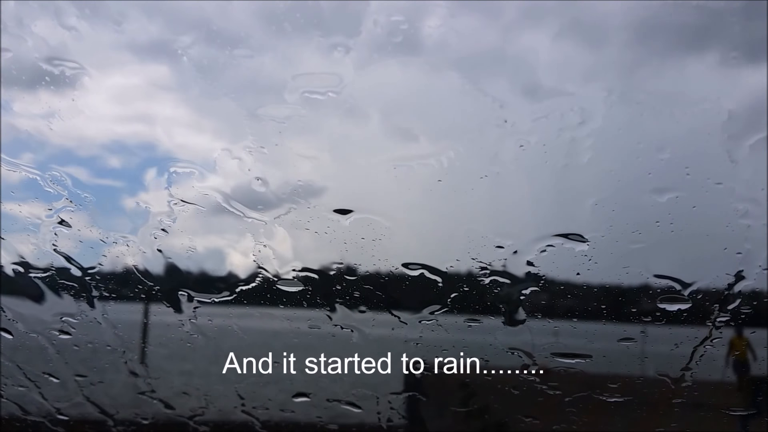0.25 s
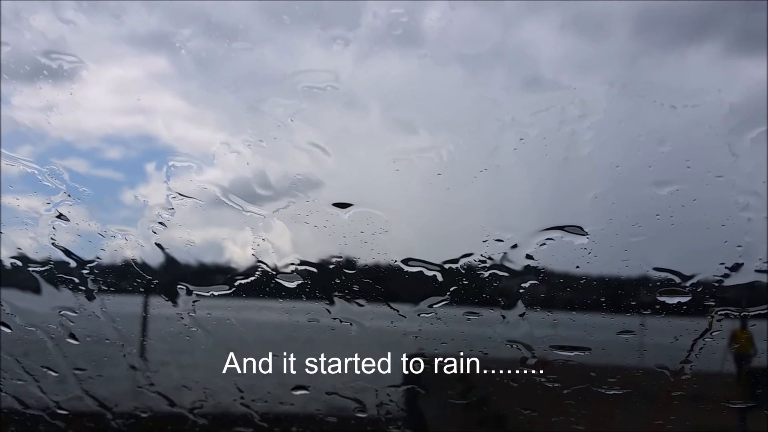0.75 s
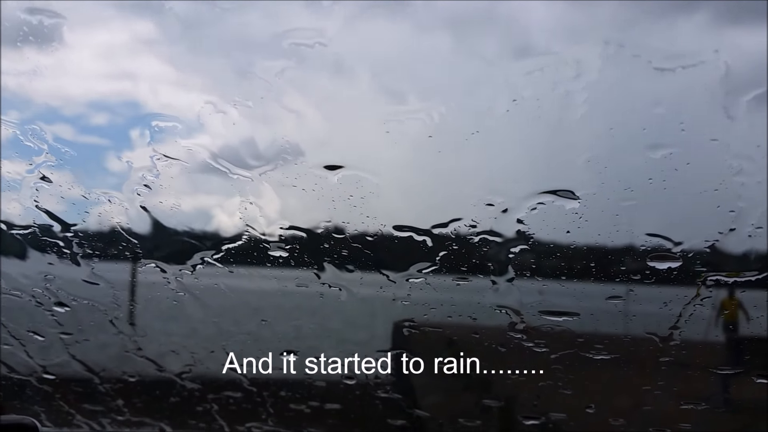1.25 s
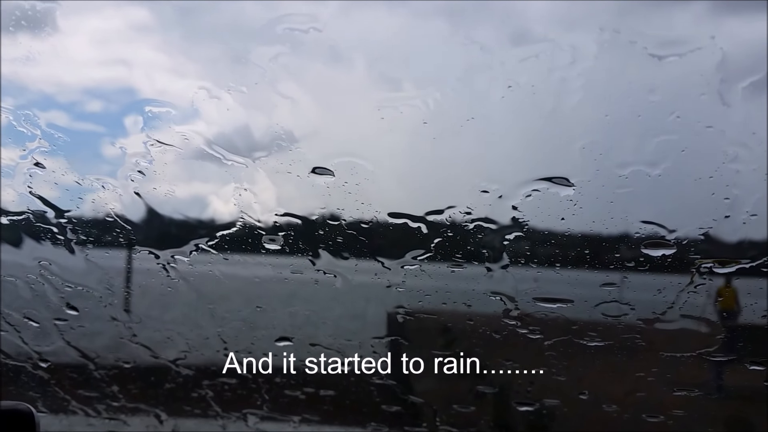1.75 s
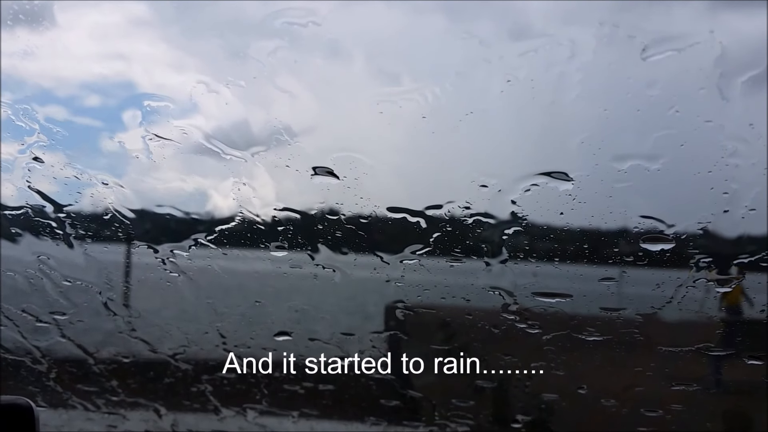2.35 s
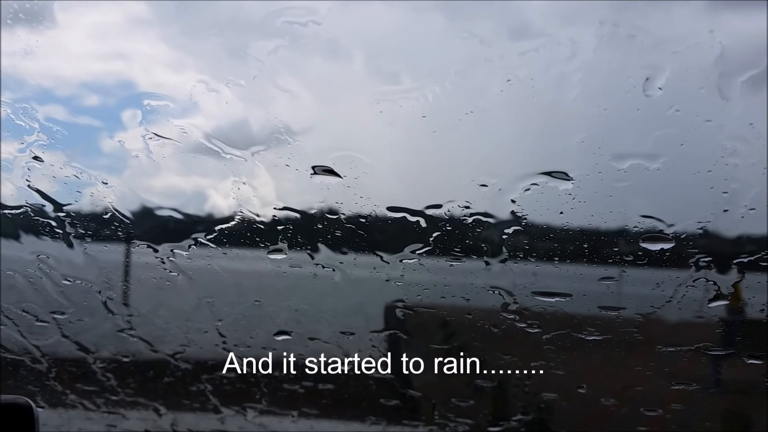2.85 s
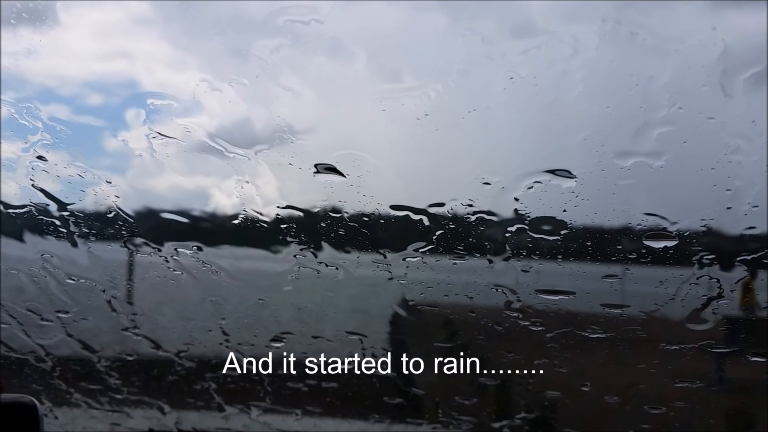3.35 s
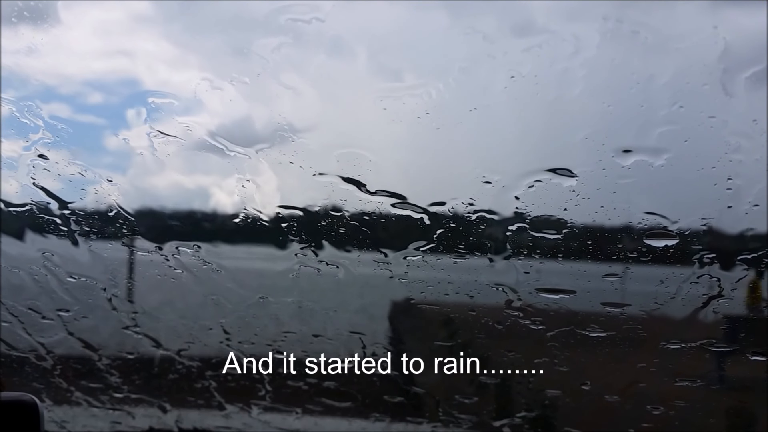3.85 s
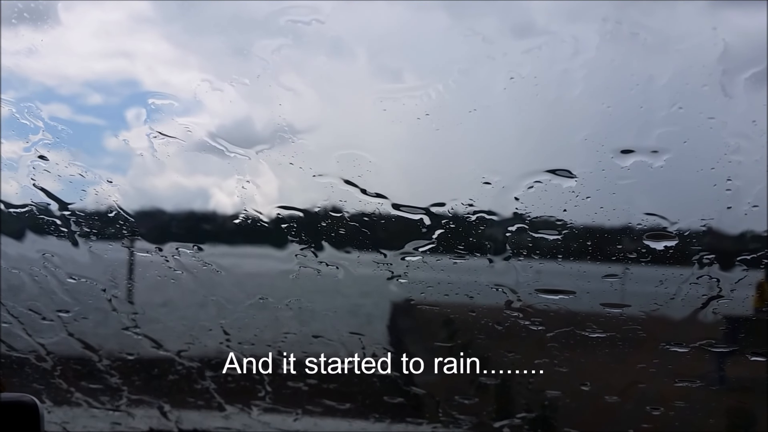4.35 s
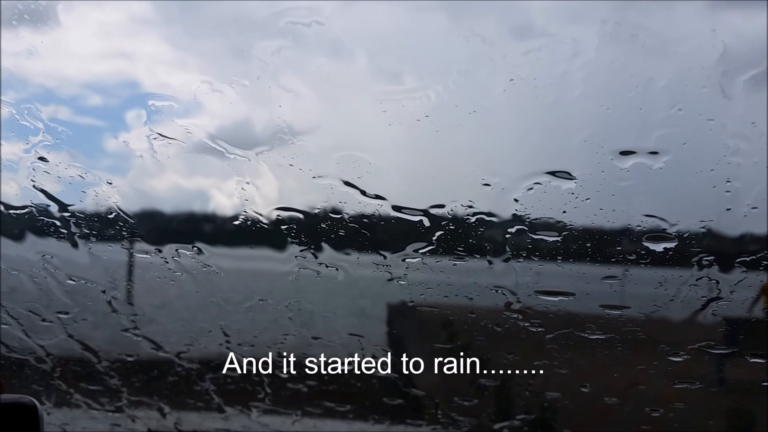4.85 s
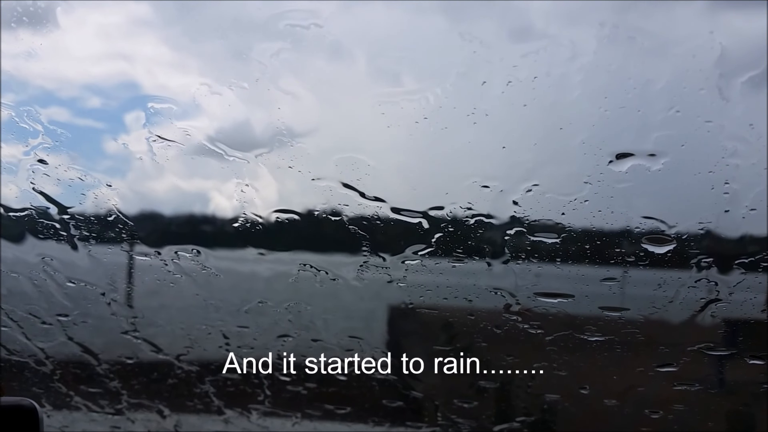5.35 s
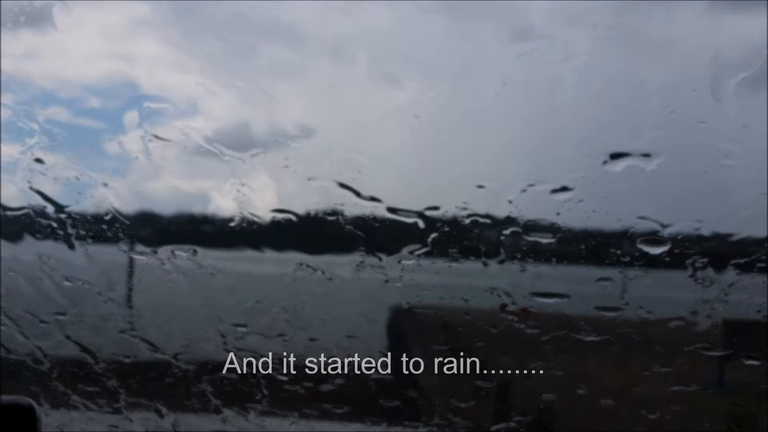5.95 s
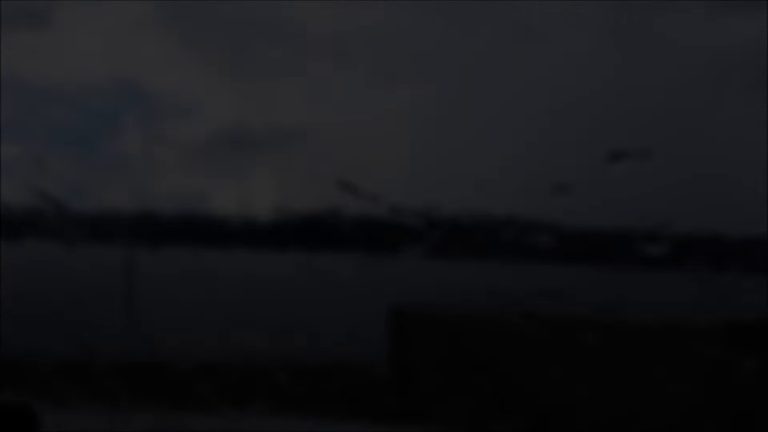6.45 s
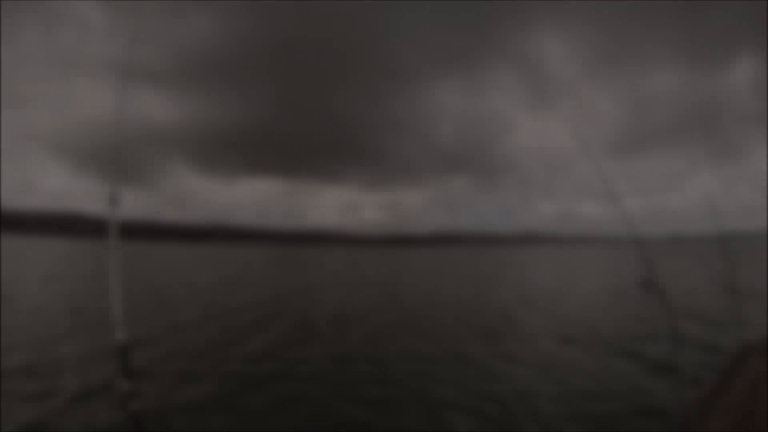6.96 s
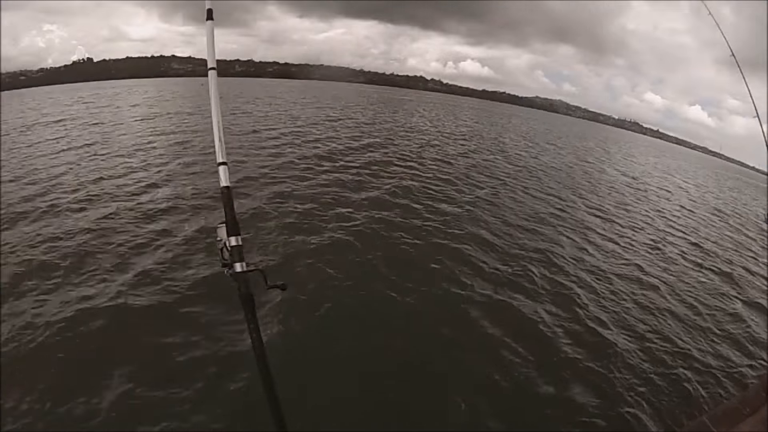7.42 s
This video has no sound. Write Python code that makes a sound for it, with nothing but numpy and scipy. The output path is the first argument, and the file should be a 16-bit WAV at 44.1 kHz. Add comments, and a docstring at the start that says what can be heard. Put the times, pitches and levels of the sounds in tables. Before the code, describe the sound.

From inside a parked car, irregular raindrops snap against the windscreen, brighter to the right, with hollow glassy tocks and soft cabin thuds over a steady distant hiss and dull roof drumming. A few low bumps knock the body early on. At about six seconds loud, lumpy wind buffets the microphone outdoors while waves wash and a splash plops. Rain and water cut out just before the end; wind continues.

```python
"""A car in the rain, then open water: drops tick on the windscreen, loudest on the right, over far rain.
Noise bursts and short tones make each drop crack, ring the pane and thud in the cabin; dull bumps add low pushes.
Then wind made of lumpy low noise buffets the microphone, and waves wash and splash as droplet-like hiss.
The rain and water stop just before the end, while the wind blows on."""
import sys
import numpy as np
from scipy import signal
from scipy.fft import rfft, irfft, next_fast_len
from scipy.io import wavfile
from scipy.ndimage import uniform_filter1d, map_coordinates

SR = 44100
rng = np.random.default_rng(int(sys.argv[2]) if len(sys.argv) > 2 else 0)


def transcribe(signal):
    """Save signal, clipped to [-1, 1], as a 16-bit WAV file at the path in sys.argv[1]."""
    frames = np.atleast_2d(signal).T
    limited = np.clip(frames, -1, 1)
    pcm = np.round(limited * 32767).astype(np.int16)
    wavfile.write(sys.argv[1], SR, pcm)


N = 339064  # length in samples
WIND_START_S, RAIN_END_S = 5.955, 7.458
# Table levels are relative: the function that plays a table may add its own dB.

# the biggest drops on the glass: (time [s], crack level [dB], pane ring level [dB], cabin thud level [dB])
BIG_DROPS = [(0.0273, -45, -35.5, -41), (0.1376, -26.5, -56, -52), (0.1847, -45, -36.5, -56),
             (0.401, -24, -39.5, -36), (0.4735, -26, -51, -50), (0.4874, -28, -52, -43),
             (0.609, -27, -38.5, -38), (0.7053, -29.5, -44, -45), (0.8476, -36, -31, -34),
             (0.8965, -46, -31, -34), (0.9784, -38, -35, -32), (1.056, -26, -48, -34.5),
             (1.0892, -30, -34.5, -33), (1.2158, -26, -47, -50), (1.2302, -31, -40.5, -44),
             (1.472, -26, -36, -43), (1.7975, -26, -44, -58), (1.8484, -25.5, -33, -31.5),
             (2.0774, -28, -33.5, -30.5), (2.1225, -35, -33.5, -34), (2.2228, -28, -32, -35),
             (2.3112, -26, -43, -37), (2.3239, -27, -46, -52), (2.4154, -27.5, -30.5, -31),
             (2.5745, -27, -44, -35), (2.6838, -31, -40, -35.5), (2.7324, -24.5, -39, -37),
             (2.8856, -28, -56, -40), (2.9584, -24.5, -49, -37.5), (3.0082, -40, -35.5, -36.5),
             (3.056, -20.5, -32.5, -31.5), (3.2151, -25, -32.5, -30.5), (3.2391, -18.5, -34, -35),
             (3.2655, -23.5, -40, -43), (3.416, -24.5, -39, -37), (3.5194, -26, -36, -34),
             (3.8375, -30.5, -35.5, -39), (4.0234, -25, -33.5, -29), (4.0737, -19.5, -34, -36),
             (4.3949, -29, -38.5, -37), (4.5162, -22.5, -31, -37.5), (4.8998, -30.5, -33.5, -31.5),
             (4.9467, -18, -33.5, -31), (5.0727, -28, -33.5, -28), (5.1807, -26, -32.5, -38),
             (5.2922, -25, -41, -43), (5.4828, -25.5, -37.5, -38), (5.5442, -20.5, -38, -33),
             (5.6115, -12, -31.5, -35), (5.663, -28, -55, -33.5), (5.7282, -23, -45, -42),
             (5.7823, -30.5, -36.5, -38.5), (5.809, -17.5, -31, -37)]
# tone colour of a hard drop bursting: (frequency [Hz], level [dB])
CRACK_COLOUR = [(700, -1), (2400, 5.5), (5000, 1.5), (16000, -25)]
# tone colour of the small ticking spatter: (frequency [Hz], level [dB])
TICK_COLOUR = [(900, -15), (1800, -1), (2600, -5.5), (3900, 3.5), (5000, 0), (8000, -9.5), (10300, -29),
               (12500, -18), (16000, -41)]
# tone colour of the ringing glass: (frequency [Hz], level [dB])
RING_COLOUR = [(300, -16.5), (550, 2), (720, -3.5), (1180, -0.5), (1600, -10), (2100, -5), (3200, -37.5),
               (7000, -73)]
# tone colour of the thud in the cabin: (frequency [Hz], level [dB])
THUD_COLOUR = [(30, -15), (80, -15), (130, 1), (180, 3.5), (270, -7.5), (450, -4.5), (750, -26.5),
               (2000, -59.5)]
# spatter level for a 0 dB crack [dB], dB of spatter per dB of crack, and loudest spatter allowed [dB]
SPATTER_DB, SPATTER_GROWS, SPATTER_MAX_DB = -12, 0.68, -28


def big_drops():
    """Each drop cracks on landing, ticks as it spatters, rings the pane and swells into a round thud."""
    s, crack_db, ring_db, thud_db = np.vstack([BIG_DROPS, stray_drops()]).T
    crack = struck(s + 0.00095, crack_db + 2.5, t60=0.0068, tail_db=-23, tail_t60=0.044, rise_s=0.00042)
    spatter_db = np.minimum(SPATTER_DB + SPATTER_GROWS * crack_db, SPATTER_MAX_DB)
    spatter = struck(s, spatter_db, t60=0.04, tail_db=-6.5, tail_t60=0.15, rise_s=0.00045) * droplets()
    ring = struck(s, ring_db, t60=0.048, tail_db=0.0, tail_t60=0.18, rise_s=0.00093)
    thud = struck(s, thud_db + 5.5, t60=0.11, tail_db=-3.5, tail_t60=0.2, rise_s=0.0055)
    tock = np.array([pane(s, ring_db + 2.5), pane(s, ring_db)])
    boom = ping(s, thud_db + 3.5, hz=170, spread=0.29, t60=0.1, rise_s=0.0045)
    sharp = coloured(spatter, TICK_COLOUR) + coloured(crack, CRACK_COLOUR)
    round_part = coloured(ring, RING_COLOUR) + coloured(thud, THUD_COLOUR)
    return cabin(sharp + round_part + tock) + snaps(s + 0.001001, crack_db + 7.0) + boom


def snaps(times, db):
    """The first contact of a drop: one sharp spike, nearer the right port."""
    spikes = np.bincount(np.clip(times * SR, 0, N - 1).astype(int), amp(db), N)
    return coloured(spikes, CRACK_COLOUR) * amp([[-8], [0]])


# tones at which the windscreen likes to ring: (frequency [Hz], level [dB])
PANE_MODES = [(335, -4), (470, 0.5), (840, -2), (1020, -2.5), (1200, 1), (1490, -7.5), (1800, -8.5)]
PANE_DB, PANE_T60_S = 3, 0.069  # added to the drop's level; time to fade by 60 dB
LANDING_DB = 6  # how much a tone's share depends on where the drop lands


def pane(times, db):
    """The glass answers at once with a hollow tock; each landing spot favours other modes."""
    shares = LANDING_DB * rng.uniform(-2.3, 1, (len(times), len(PANE_MODES)))
    tock = np.zeros(N)
    for (hz, mode_db), share in zip(PANE_MODES, shares.T):
        tock += ping(times, db + PANE_DB + mode_db + share, hz=hz, spread=0.054, t60=PANE_T60_S)
    return tock


# stray drops, over the rain level: crack, ring and thud level [dB]
STRAY_LEVELS = [2.5, 3.5, 4]
STRAY_PER_S, STRAY_SCATTER_DB = 8, 0.5


def stray_drops():
    """Soft drops land by chance, harder in heavier rain: rows like those of the big drops."""
    s = falling(STRAY_PER_S)
    scatter = STRAY_SCATTER_DB * rng.uniform(-2.3, 1.55, (len(s), len(STRAY_LEVELS)))
    db = rain_db(s)[:, None] + STRAY_LEVELS + scatter
    return np.column_stack([s, db])


# light drops on the glass: (time [s], level [dB])
LIGHT_DROPS = [(0.015, -28.5), (0.0752, -35), (0.0908, -27), (0.295, -30.5), (0.3324, -28.5),
               (0.351, -28.5), (0.7868, -27), (0.9368, -32), (1.034, -31.5), (1.1517, -30), (1.267, -29.5),
               (1.3528, -33.5), (1.4982, -29.5), (1.5231, -26), (1.7108, -31), (1.9892, -28.5),
               (2.0344, -29), (2.2675, -31.5), (2.278, -29), (2.4708, -32), (2.5417, -32), (2.707, -26),
               (2.7707, -27), (3.129, -29), (3.1673, -29), (3.196, -26.5), (3.347, -29.5), (3.389, -33),
               (3.492, -29.5), (3.5988, -27), (3.7647, -35), (3.7905, -32.5), (3.8781, -26), (3.935, -28.5),
               (3.949, -29.5), (3.9812, -26), (4.114, -28), (4.129, -32), (4.164, -35.5), (4.193, -35),
               (4.245, -27), (4.288, -34), (4.3243, -26.5), (4.3431, -28.5), (4.4812, -31.5), (4.574, -29),
               (4.6576, -28), (4.8371, -36.5), (4.9243, -26), (4.9797, -23.5), (5.1175, -26), (5.1697, -32),
               (5.2777, -32), (5.3917, -25), (5.6207, -30), (5.7121, -30), (5.898, -31), (6.1682, -27),
               (6.339, -26), (6.367, -28.5), (6.418, -25), (6.5788, -28), (6.6024, -30), (6.621, -30),
               (7.0372, -25), (7.0873, -30), (7.2966, -20.5), (7.448, -27.5)]


def light_drops():
    """Light drops give one short, bright tick with its own pitch and barely ring the pane."""
    s, db = np.transpose(LIGHT_DROPS)
    burst = struck(s + 0.0011, db + 4, t60=0.0086, tail_db=-12, tail_t60=0.064, rise_s=0.00054)
    tock = np.array([pane(s, db - 10.5), pane(s, db - 8)])
    click = ping(s + 0.001018, db + 0.5, hz=5000, spread=0.39, t60=0.003)
    return cabin(coloured(burst, TICK_COLOUR) + tock) + click * amp([[-10], [0]])  # clicks on the right


SPIT_PER_S, SPIT_DB = 22, 11.5  # level is over the rain level


def spits():
    """Tiny fast drops click on the glass, each at its own pitch, without ringing the pane."""
    s = falling(SPIT_PER_S)
    db = rain_db(s) + SPIT_DB + 4 * rng.uniform(-3.1, 1, len(s))
    clicks = ping(s, db + 1.0, hz=4230, spread=0.44, t60=0.0027)
    bursts = coloured(struck(s, db + 2.5, t60=0.0053, tail_db=-15, tail_t60=0.025), TICK_COLOUR)
    return (clicks + bursts) * amp([[-10], [0]])


# tone colour of the small drops: (frequency [Hz], level [dB])
PATTER_COLOUR = [(200, 0), (500, 8), (780, 3), (1180, 9), (2400, -3), (3900, 0), (8000, -13), (10300, -28),
                 (16000, -23.5)]
PATTER_DB = 7.5  # over the rain level


def patter(rate=100, spread_db=5):
    """Many small drops land at random between the big ones."""
    times = falling(rate)
    sizes_db = spread_db * np.clip(rng.standard_normal(len(times)), -2, 2)
    blows = struck(times, sizes_db, t60=0.0018, tail_db=-5.0, tail_t60=0.099)
    return unit(coloured(blows, PATTER_COLOUR)) * amp(rain_db(np.arange(N) / SR) + PATTER_DB)


# how hard it rains: (time [s], level [dB])
RAIN_LEVEL = [(0.0, -44.5), (0.2, -50), (1.06, -44.5), (1.28, -48.5), (3.43, -46.5), (3.66, -46.5),
              (3.96, -45), (4.65, -48), (5.69, -44.5), (6.18, -47), (6.67, -46.5), (7.3, -45.5)]
EASING_DB = -2  # the rain level drops by this once the wind blows


def rain_db(times):
    """How hard it rains at these moments."""
    return np.interp(times, *np.transpose(RAIN_LEVEL)) + EASING_DB * (times > WIND_START_S)


# tone colour of the padded roof: (frequency [Hz], level [dB])
ROOF_COLOUR = [(25, -22), (70, -8.5), (160, 6), (280, -4), (480, -10.5), (1300, -18.5), (3000, -63)]


def roof(rate=30, spread_db=4.0):
    """Drops on the padded roof merge into a dull drumming."""
    times = falling(rate)
    sizes_db = spread_db * np.clip(rng.standard_normal(len(times)), -2, 2)
    blows = struck(times, sizes_db, t60=0.026, tail_db=-3.0, tail_t60=0.21)
    return unit(coloured(blows, ROOF_COLOUR)) * amp(-40.5)


# how alike left and right are: (frequency [Hz], likeness [0 to 1])
LIKENESS = [(60, 1), (200, 0.82), (600, 1), (1500, 0.13), (4000, 0.071)]
# left against right: (frequency [Hz], level [dB])
LEFT_SHADE = [(60, 4.5), (130, -3), (200, -2), (450, -6), (750, -9.5), (1200, -11.5), (2500, -19.5),
              (3700, -2), (6000, -40.5), (16000, 15.5)]


def cabin(x):
    """Two unrelated signals become one field: alike in the bass, weaker on the left in most of the treble."""
    def blend(hz):
        turn = np.arccos(np.clip(along(LIKENESS, hz), -1, 1)) / 2
        return np.array([np.cos(turn), np.sin(turn)])

    def shade(hz):
        sides = np.array([amp(along(LEFT_SHADE, hz)), np.ones_like(hz)])
        return sides / np.linalg.norm(sides, axis=0)

    mid, side = filtered(x, blend)
    return filtered(np.array([mid + side, mid - side]), shade)


# dull bumps on the body: (time [s], level [dB], push time [s])
BODY_BUMPS = [(0.812, -26, 0.003), (0.8349, -10.5, 0.0018), (0.842, -24, 0.0052), (.862, -21, 0.0019),
              (1.056, -25.5, 0.0039), (1.629, -32, 0.0048), (5.593, -18, 0.0028)]


def bumps():
    """A soft knock pushes the air and shakes the pane; the cabin booms briefly after it."""
    out = np.zeros(N)
    for s, db, push_s in BODY_BUMPS:
        t = np.maximum(np.arange(N) / SR - s, 0)
        boom = amp(db - 7 - 60 * t / 0.13) * np.sin(2 * np.pi * 105 * t)
        out += push(s, db, push_s) + boom
    s, db, _ = np.transpose(BODY_BUMPS)
    shake = coloured(struck(s, db - 13, t60=0.017, tail_db=-10, tail_t60=0.078), RING_COLOUR)[0]
    return filtered(out, lambda hz: 1j * hz / (1j * hz + 45)) + shake  # thin out the bass below 45 Hz


# strength of the wind: (time [s], buffet level [dB], roar level [dB])
WIND_LEVELS = [(5.97, -18, -21), (6.136, -15, -15.5), (6.192, -18.5, -28.5), (6.226, -36, -22.5),
               (6.27, -21.5, -18.5), (6.322, -23, -22), (6.754, -20.5, -18), (6.87, -29, -22),
               (6.978, -15, -20), (7.04, -14, -15.5), (7.146, -16.5, -26), (7.208, -16, -15),
               (7.298, -23.5, -21), (7.488, -22, -18.5), (7.518, -22.5, -19), (7.68, -25, -17.5)]
# strength of the fluttering: (time [s], level [dB])
FLUTTER_LEVELS = [(5.97, -30.5), (6.04, -26.5), (6.14, -27.5), (6.2, -36), (6.27, -29), (6.5, -29),
                  (6.75, -24.5), (6.83, -29), (6.865, -21.5), (6.95, -23), (7.11, -28.5), (7.21, -23),
                  (7.285, -29), (7.32, -34), (7.36, -24), (7.56, -22), (7.68, -27)]
# the deepest part of the main gust: (time [s], level [dB])
SURGE_LEVELS = [(6.88, -39), (6.97, -20), (7.21, -15.5), (7.34, -20), (7.55, -29.5)]
# single hard eddies: (time [s], level [dB], push time [s])
HARD_PUFFS = [(6.048, -5.5, 0.0018), (6.965, -4.5, .006), (7.029, -13, 0.0032), (7.048, -10, .003),
              (7.206, -4, 0.0057), (7.404, -10, 0.0048), (7.468, -6, 0.0051)]
# tone colour of the slow buffeting: (frequency [Hz], level [dB])
BUFFET_COLOUR = [(12, -11.5), (38, -2.5), (66, 5.5), (110, 6.5), (170, -15.5), (400, -80)]
# tone colour of the roar: (frequency [Hz], level [dB])
ROAR_COLOUR = [(70, -19.5), (135, 2.5), (300, -2), (400, -8), (600, -27), (1500, -80)]
# tone colour of the deep surge: (frequency [Hz], level [dB])
SURGE_COLOUR = [(12, -11), (37, 5), (62, -0.5), (100, -25), (200, -66)]
# tone colour of the fast flutter: (frequency [Hz], level [dB])
FLUTTER_COLOUR = [(250, -13.5), (420, 0.5), (580, 0), (800, -10), (1600, -35.5), (4000, -53), (16000, -80)]
PORT_DIFFERENCE_DB = -49.5  # the part of the wind that differs between the two ports


def wind():
    """Eddies hit the microphone: big slow ones buffet, small fast ones roar and flutter in rolling waves."""
    buffet_db, roar_db = curves(WIND_LEVELS)
    flutter_db, = curves(FLUTTER_LEVELS)
    surge_db, = curves(SURGE_LEVELS)
    eddies = wobble(55)

    def layer(spectrum, lumpy_db):
        """Turbulence of even strength, broken into lumps, nearly the same at both ports."""
        flow = coloured(noise(), spectrum)
        power = uniform_filter1d(uniform_filter1d(flow ** 2, size=SR // 25), size=SR // 40)
        strength = np.sqrt(np.abs(power) + 1e-12)
        mid, side = flow / strength * amp(lumpy_db * eddies)
        return unit(mid + amp(PORT_DIFFERENCE_DB) * np.array([side, -side]))

    air = amp(buffet_db + 0.4) * layer(BUFFET_COLOUR, lumpy_db=1.5)
    air += amp(roar_db + 0.5) * layer(ROAR_COLOUR, lumpy_db=2.5)
    air += amp(surge_db) * layer(SURGE_COLOUR, lumpy_db=3.5)
    air -= sum(push(*puff) for puff in HARD_PUFFS)
    air = .75 * np.tanh(air / .75)  # the strongest pushes are rounded off
    air += amp(flutter_db + 1.34) * layer(FLUTTER_COLOUR, lumpy_db=3.0)
    return air * after(WIND_START_S, fade=0.01)


# splashes at their loudest: (time [s], level [dB])
SPLASH_PEAKS = [(6.794, -25), (7.26, -39.5)]
# flecks of spray: (time [s], level [dB])
SPRAY_FLECKS = [(5.954, -34.5), (6.156, -45), (6.705, -43), (6.7228, -31.5), (6.7406, -34), (6.7485, -36),
                (6.811, -35), (6.859, -38), (6.954, -38), (7.272, -34), (7.406, -38)]
# tone colour of the washing water: (frequency [Hz], level [dB])
WATER_COLOUR = [(300, 20), (800, 16.5), (1200, 14.5), (2500, 2), (3800, 1), (8000, -13), (10300, -21),
                (12500, -8), (16000, -16)]
# tone colour of water landing: (frequency [Hz], level [dB])
SLAP_COLOUR = [(500, -17), (1100, -4.5), (1500, -20), (3000, -45)]
SPLASH_RISE_DB_PER_S, SPLASH_FALL_DB_PER_S = 104, 233.5
WASH_DB, WASH_SWELL_S = -44.5, 0.48  # the wash of the waves swells as the wind starts


def splash():
    """Waves wash steadily; each splash hisses up and dies, and the first plops down among sharp flecks."""
    t = np.arange(N) / SR
    fleck_s, fleck_db = np.transpose(SPRAY_FLECKS)
    flecks = struck(fleck_s, fleck_db + 3.0, t60=0.005, tail_db=-18, tail_t60=.03)
    level = amp(WASH_DB) * after(WIND_START_S, fade=WASH_SWELL_S)
    for s, db in SPLASH_PEAKS:
        drop_db = np.maximum(SPLASH_RISE_DB_PER_S * (s - t), SPLASH_FALL_DB_PER_S * (t - s))
        level = level + amp(db - drop_db)
    wash = noise() * level * unit(droplets() ** 1.4)
    landing = SPLASH_PEAKS[0][0]
    slap = struck(np.array([landing - .004]), [-20], t60=0.034, tail_db=-8, tail_t60=.1)
    return coloured(wash, WATER_COLOUR) + coloured(slap, SLAP_COLOUR) + plops(landing, count=9) + flecks


def plops(s, count):
    """Falling water traps a handful of bubbles, each with its own note; the middle ones are loudest."""
    times = s + np.linspace(-.035, .025, count) + .003 * rng.uniform(-0.7, 1, count)
    return ping(times, -22 - 400 * np.abs(times - s), hz=1206, spread=.3, t60=0.018)


# tone colour of the distant rain: (frequency [Hz], level [dB])
FAR_COLOUR = [(100, 7), (500, 8.5), (1200, 2), (1800, 0), (2600, -6.5), (3200, -4.5), (3700, 5),
              (4500, -7.5), (6300, -16), (10300, -44), (12000, -17.5), (16000, -15)]


def far_rain():
    """A nearly even hiss of rain all around, swaying slightly in level."""
    sway_db = .9 * wobble(14) + .4 * wobble(2)
    return coloured(noise(), FAR_COLOUR) * amp(-46.5 + sway_db)


def falling(rate):
    """Landing times at rate a second, each nudged at random from an even beat."""
    count = int(rate * N / SR)
    return np.clip((np.arange(count) + rng.uniform(-1, 1, count)) / rate, 0, N / SR)


def struck(times, db, t60, tail_db, tail_t60, rise_s=0):
    """Blows excite countless close modes, heard as noise: a rise, a quick decay, then a tail."""
    t = np.arange(SR // 3) / SR
    power = np.bincount(np.clip(times * SR, 0, N - 1).astype(int), amp(db) ** 2, N)
    decay = amp(-60 * t / t60) ** 2 + amp(tail_db - 60 * t / tail_t60) ** 2
    shape = decay * swell(t, rise_s) ** 2
    return np.sqrt(np.abs(signal.fftconvolve(power, shape)[:N])) * noise()


def ping(times, db, hz, spread, t60, rise_s=0):
    """One damped tone for each blow, its pitch scattered around hz."""
    t = np.arange(SR // 8) / SR
    pitch = hz * np.exp(spread * rng.uniform(-1.04, 1, (len(times), 1)))
    tones = amp(db[:, None] - 60 * t / t60) * np.sin(2 * np.pi * pitch * t) * swell(t, rise_s)
    index = (times[:, None] * SR).astype(int) + np.arange(len(t))
    return np.bincount(index.ravel(), tones.ravel(), N)[:N]


def push(s, db, push_s):
    """One soft-edged push of air and its slower rebound."""
    u = np.clip((np.arange(N) / SR - s) / push_s, 0, 20)
    return amp(db + 6.5) * np.sin(np.pi * u / (1 + 0.12 * u)) * np.exp(-.65 * u) * np.tanh(np.pi * u)


def droplets():
    """A gain of rms 1 that breaks a hiss into separate tiny droplets."""
    return unit(amp(5 * np.minimum(wobble(600), 2)))


def swell(t, rise_s):
    """Builds from 0 towards 1, most of the way in about rise_s."""
    return 1 - np.exp(-t / (rise_s + 1 / SR))


def amp(db):
    """Decibels to gain."""
    return 10 ** (np.asarray(db) / 20)


def unit(x):
    """Scale to rms 1."""
    return x / np.sqrt(np.mean(x ** 2) + 1e-20)


def along(points, hz):
    """Read (frequency [Hz], value) points on a log frequency axis."""
    f, v = np.transpose(points)
    return np.interp(np.log(hz + 1), np.log(f + 1), v)


def curves(rows):
    """One value per sample for each column after the time."""
    s, *cols = np.transpose(rows)
    return [np.interp(np.arange(N) / SR, s, c) for c in cols]


def after(s, fade):
    """0 before s, rising to 1 within fade seconds."""
    return np.clip((np.arange(N) / SR - s) / fade, 0, 1)


def wobble(rate):
    """A smooth random curve, rate knots a second."""
    knots = rng.standard_normal(int(N * rate / SR) + 4)
    return map_coordinates(knots, [np.arange(N) * rate / SR])


def noise(channels=2):
    """White noise, unrelated between channels."""
    return rng.standard_normal((channels, N))


def filtered(x, response):
    """Shape x by a response given as a function of frequency."""
    m = next_fast_len(N + SR // 2)
    return irfft(rfft(x, m) * response(np.fft.rfftfreq(m, 1 / SR)), m)[..., :N]


def coloured(x, spectrum):
    """Filter of unit energy with the given tone colour, without sound before its cause."""
    size = 8192
    # folding the cepstrum onto positive times gives the filter that answers soonest (minimum phase)
    cepstrum = irfft(np.log(amp(along(spectrum, np.fft.rfftfreq(size, 1 / SR)))))
    cepstrum[1:size // 2] *= 2
    cepstrum[size // 2 + 1:] = 0
    kernel = irfft(np.exp(rfft(cepstrum)))
    kernel = kernel[None] / np.linalg.norm(kernel)
    return signal.fftconvolve(np.atleast_2d(x), kernel, axes=1)[:, :N]


def scene():
    """Rain and water stop together; the wind blows on."""
    wet = big_drops() + light_drops() + spits() + cabin(patter() + roof()) + splash() + far_rain()
    wet = wet * (1 - after(RAIN_END_S, fade=0.0028))
    return wet + bumps() * amp([[0], [-8]]) + wind()  # bumps are louder on the left


def record(dry):
    """The recorder weakens what lies below 24 Hz and keeps nothing from 16 kHz up; the very end fades."""
    low_cut = signal.butter(3, 24, "highpass", fs=SR, output="sos")
    faded = signal.sosfilt(low_cut, dry) * (1 - after(N / SR - .003, fade=.003))
    return filtered(faded, lambda hz: hz < 16000)


dry = scene()
out = record(dry)
transcribe(out)
```